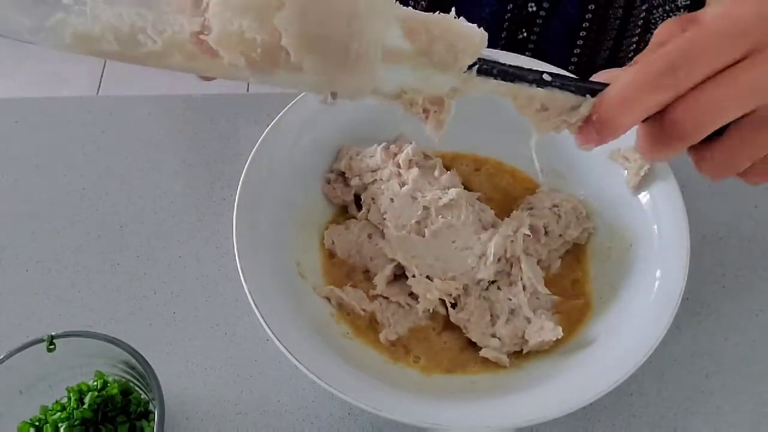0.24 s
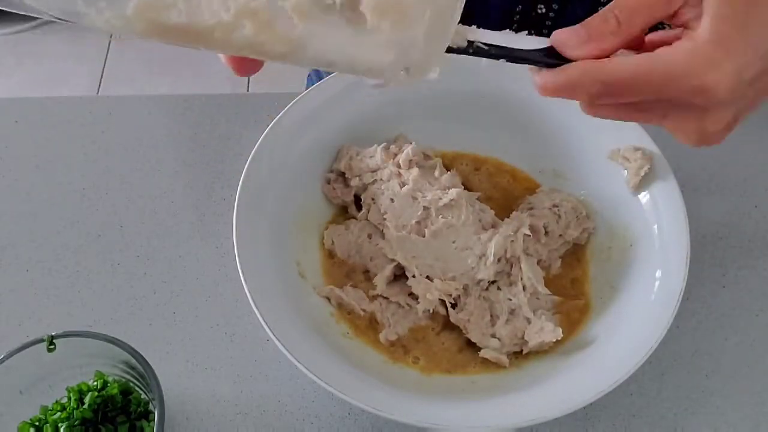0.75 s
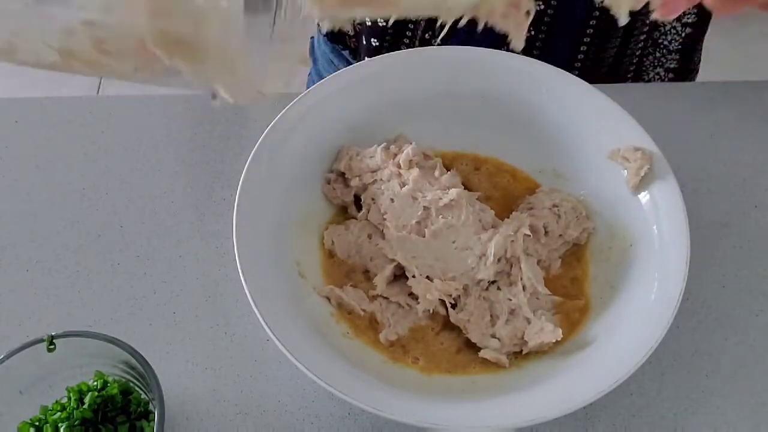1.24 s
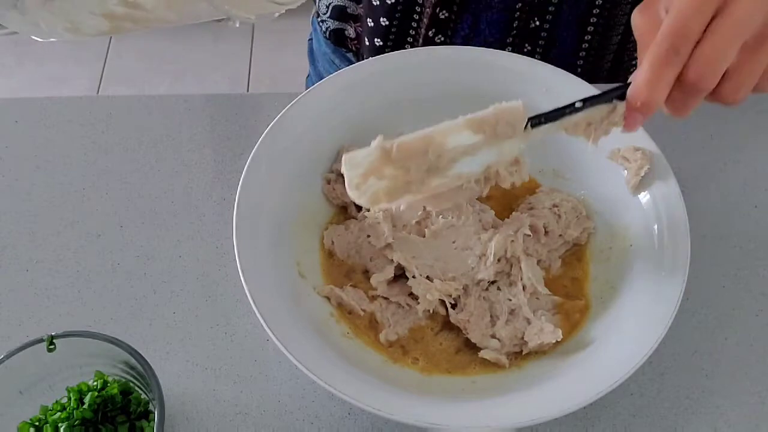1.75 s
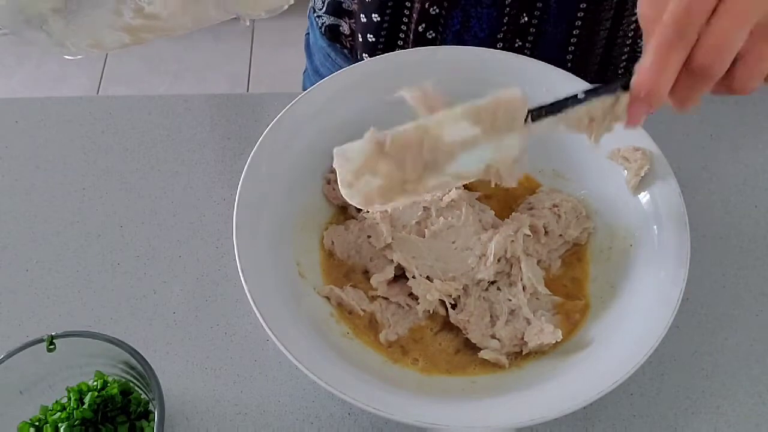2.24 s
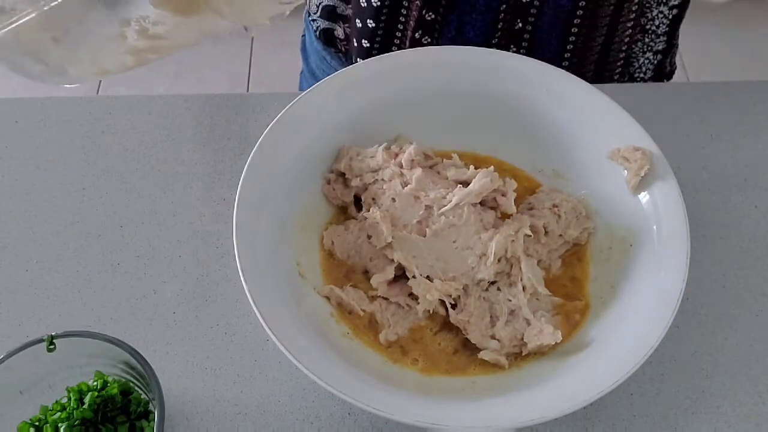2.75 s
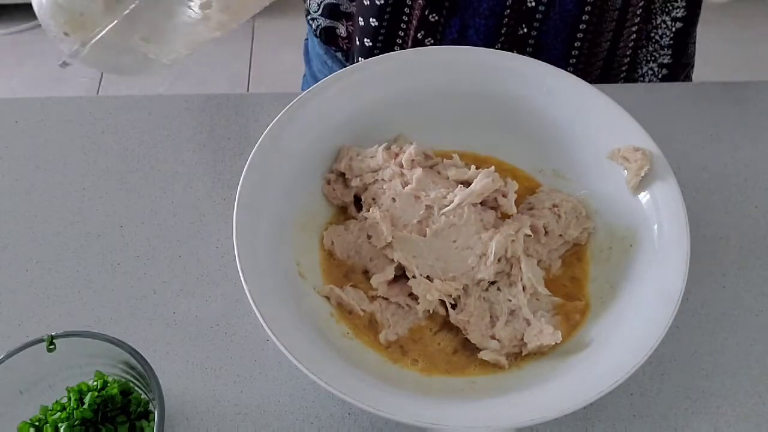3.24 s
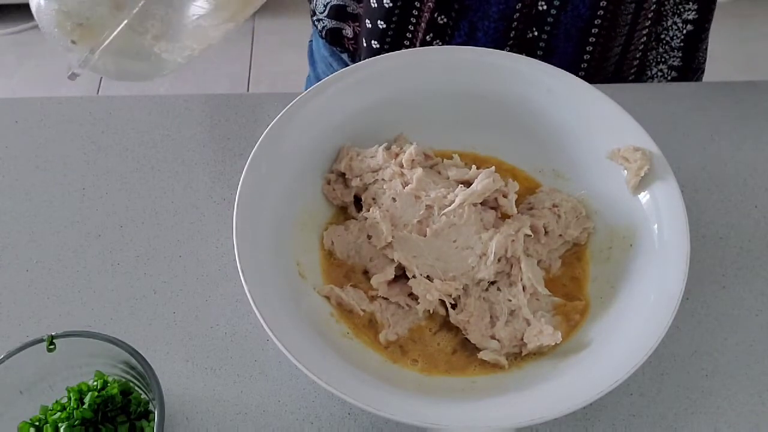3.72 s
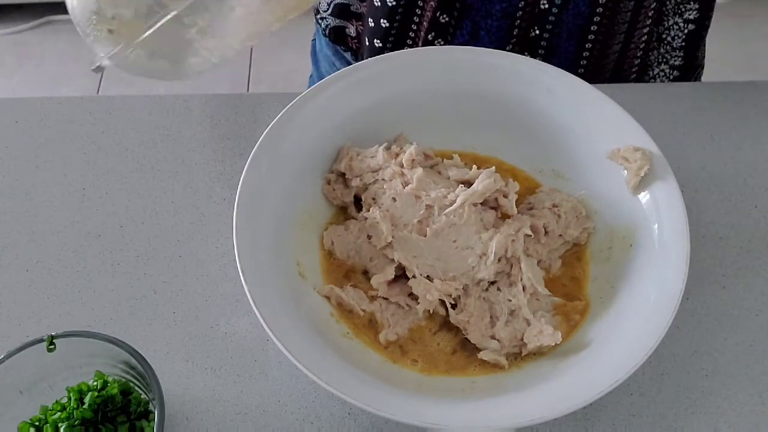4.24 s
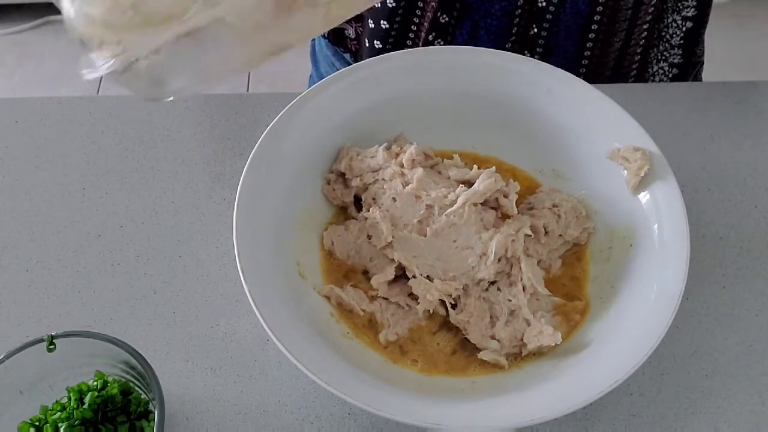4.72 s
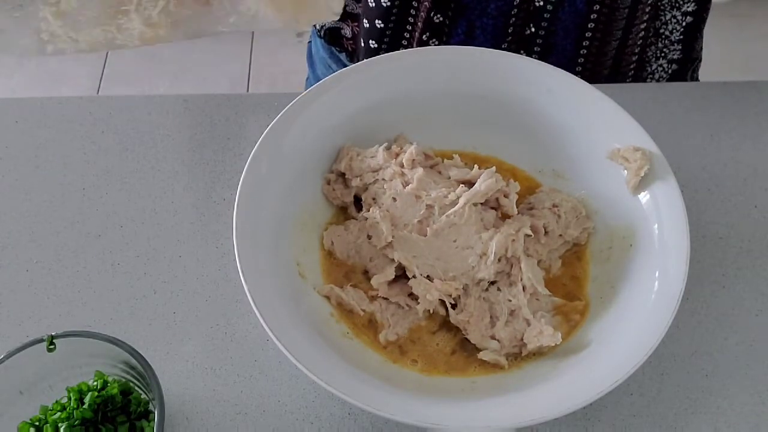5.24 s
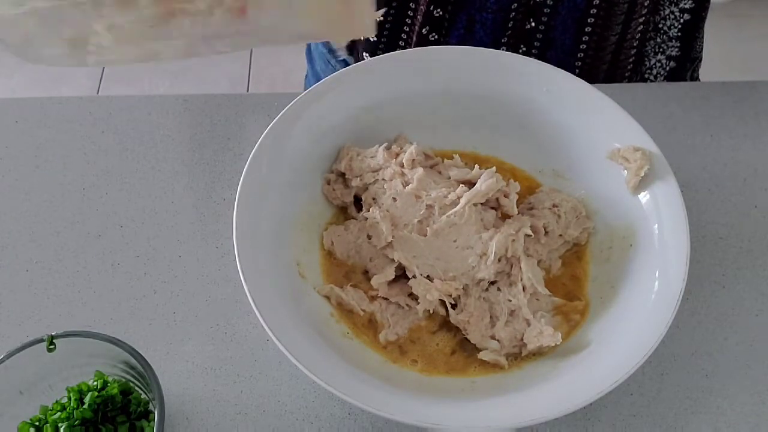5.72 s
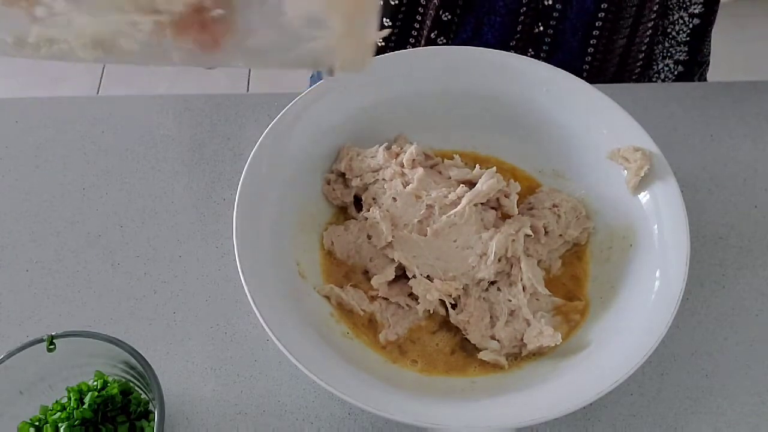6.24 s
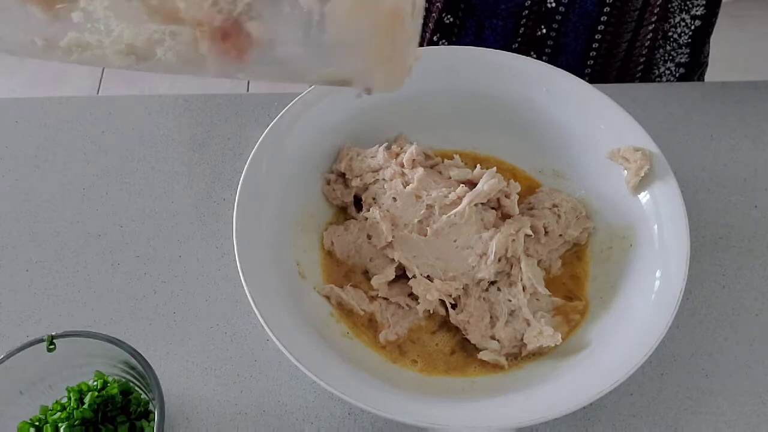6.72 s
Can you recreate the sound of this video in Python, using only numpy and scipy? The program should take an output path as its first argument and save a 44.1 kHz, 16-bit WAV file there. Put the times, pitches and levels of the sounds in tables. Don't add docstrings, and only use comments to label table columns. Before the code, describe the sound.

A steady, low refrigerator drone with soft airy hiss fills a small hard kitchen. In front of it, recorded close in stereo, a spatula blade hits glass sharply, then drags through sticky paste with fine crackle and little smacks. After a quiet gap with a few soft peels, knocking and scraping return in a busy cluster, with short damped glass rings and low jug thuds, easing into light wet dabs at the end.

```python
import sys
import numpy as np
from scipy import signal
from scipy.fft import rfft, irfft, next_fast_len
from scipy.io import wavfile

SR = 44100
rng = np.random.default_rng(int(sys.argv[2]) if len(sys.argv) > 2 else 0)


def file_out(sig):
    cols = np.atleast_2d(sig).T
    lim = np.clip(cols, -1, 1)
    pcm = np.round(lim * 32767).astype(np.int16)
    wavfile.write(sys.argv[1], SR, pcm)


def convert_level_to_amplitude(level_db):
    exponent = np.asarray(level_db, float) / 20
    return 10 ** exponent


N = 307377

COMPRESSOR_HZ, FAN_HZ = 59.185, 44.896
LEFT_LAG_SAMPLES = 10

# multiple, left_db, right_db, left_lead_rad
COMPRESSOR_HARMONICS = [(1, -48, -47.5, -0.0), (3, -75.5, -77.5, 2.5), (4, -61.5, -64.5, -0.36),
                        (5, -71, -66.5, 0.9), (7, -65.5, -64.5, -0.1), (8, -66.5, -68, 7.5),
                        (11, -68.5, -64.5, -0.66), (13, -68, -70, 0.47), (14, -67, -67.5, -2),
                        (16, -78, -78.5, -0.5), (17, -112, -83.5, -5.5), (19, -70, -72, -3.5),
                        (20, -99, -78.5, -11), (22, -75.5, -80, -3.5), (24, -74.5, -74, 2.5),
                        (33, -82.5, -79, -1.5), (34, -105, -83, 3), (45, -83, -95, 1.4),
                        (47, -87, -89.5, 2.5), (77.5, -91.5, -81.5, 2.5)]
# multiple, left_db, right_db, left_lead_rad
FAN_HARMONICS = [(1, -52, -51, 0.24), (2, -60.5, -62.5, 0), (3, -66, -64.5, -0.5), (4, -48.5, -46.5, -0.54),
                 (5, -67, -70, 1), (6, -67.5, -72, -0.5), (7, -67, -82, 0.7), (8, -81.5, -78.5, 4),
                 (9, -83, -75, -3), (11, -66.5, -66, 0), (12, -66, -65.5, 1), (13, -96, -85.5, -5),
                 (14, -72, -82.5, -1), (18, -95, -80, -4)]
# time_s, level_db
MAINS_BUZZ = [
    (0, -59),
    (5.9, -67),
    (6.2, -50),
    (6.65, -50),
    (6.97, -54),
]
# time_s, level_db
VALVE_WHINE = [(0.0, -71.5), (0.13, -71), (0.33, -80), (0.45, -82), (0.5, -76), (0.68, -75), (0.89, -71),
               (1.08, -71.5), (1.76, -66.5), (2.66, -65.5), (3.3, -69), (3.49, -66), (3.82, -68.5),
               (4.46, -65.5), (5.09, -72.5), (6.46, -69.5), (6.97, -76)]
# freq_hz, density_db_per_hz
AIR_SPECTRUM = [(20, -11.5), (45, 7), (110, -2.5), (180, 2.5), (215, -3.5), (480, -2.5), (850, -8),
                (1050, -18), (1400, -15.5), (1750, -20.5), (2000, -24.5), (2400, -26.5), (3800, -28.5),
                (5000, -30.5), (6600, -32), (7700, -30.5), (9500, -33.5), (16000, -32.5)]
# freq_hz, correlation
AIR_LIKENESS = [(60, 1), (180, 1), (550, 0.81), (1650, -0.12), (4970, 0.0057), (15000, -0.11)]
# pitch_hz, t60_s, level_db
COOLANT_HISSES = [
    (1930, 0.029, -79.5),
    (4680, .04, -89),
    (5000, .035, -91),
]
# start_s, length_s, crackle_start_db, swell_db
BLADE_STROKES = [(0, 0.36, -73.5, 6.5), (0.343, 0.37, -63.5, -9.5), (0.722, 0.17, -61, -2.5),
                 (.89, 0.22, -60.5, -22), (2.02, 0.16, -72.5, 2.5), (2.239, .14, -68, 10.5),
                 (3.3, 0.18, -63.5, -5), (4.135, 0.11, -62, 5.5), (4.4, 0.2, -61.5, 1),
                 (4.559, 0.19, -60.5, -18), (4.833, 0.17, -63.5, -8), (5.083, 0.19, -64.5, -9),
                 (5.338, 0.15, -71, -6), (5.602, 0.19, -77, 13), (5.793, 0.22, -62.5, -7.5),
                 (6.121, 0.076, -57.5, -8.5), (6.29, .13, -80, 13), (3.398, 0.042, -52, 2),
                 (.74, .07, -61, -5.5), (.9, 0.043, -58.5, -4), (6.367, .05, -71, -2),
                 (.44, 0.095, -72, -3), (4.653, 0.33, -66, -6), (5.53, 0.07, -57, -12),
                 (5.882, 0.12, -70.5, -4), (6.452, 0.33, -63.5, -10)]
# start_s, peak_db, fizz_re_peak_db
PASTE_SMACKS = [(0.057, -51.5, -9), (.0804, -45.5, -12), (0.181, -41, -13), (.6294, -54, -8),
                (.6624, -53.5, -6), (.914, -36, -10), (0.999, -43.5, -11), (1.0214, -51.5, -2),
                (1.058, -50, -11), (1.5763, -59, -3.5), (1.7585, -51.5, -8), (2.0386, -50.5, -5),
                (2.0512, -49.5, -2), (2.146, -50.5, -4.5), (3.214, -50.5, -7.5), (3.3414, -48, -9),
                (3.506, -48, -9), (3.829, -58, -6), (4.309, -48, -6.5), (5.665, -34, -9.5),
                (5.9594, -49.5, -8), (6.0317, -51.5, -10), (6.303, -44, -6.5), (6.3733, -46, -12),
                (6.5155, -42.5, -9), (6.732, -54, -5)]
# start_s, gap_s, peak_db, fizz_re_peak_db
PASTE_PEELS = [
    (.4034, .0325, -48.5, -7.5),
    (0.7183, 0.019, -40, -10),
    (2.2752, 0.023, -41, -9.5),
    (3.3818, .0167, -29, -7),
    (6.5387, 0.049, -40, -10),
]
# start_s, peak_db, fizz_re_peak_db, body_re_peak_db, t60_s
BLADE_KNOCKS = [(0.3364, -13.5, -19.5, -37, 0.014), (0.3372, -19.5, -17, -18, 0.043),
                (.883, -30, -17, -2.5, 0.017), (0.8874, -28.5, -26.5, -5, 0.051),
                (3.3497, -39, -19, -24, 0.096), (4.129, -36.5, -13.5, -32, 0.052),
                (4.1473, -39.5, -15, -24, 0.066), (4.4393, -42.5, -15.5, -2, 0.04),
                (4.4944, -46.5, -19, -8, .027), (4.5476, -18, -20, -12, 0.049),
                (4.833, -26.5, -20.5, -25, 0.039), (5.0962, -48, -16, -22, .035),
                (5.2962, -33, -15, -7.5, 0.042), (5.434, -41.5, -14, -25, 0.071),
                (5.5586, -26.5, -23, -14, 0.038), (5.657, -41.5, -15, -20, 0.048),
                (5.8425, -36.5, -21.5, -15, 0.031), (6.9252, -53, -20, -13, .035)]
# start_s, peak_db, body_re_peak_db, body_hz
PASTE_DABS = [(0.308, -52.5, -1, 2860), (0.523, -58, 9, 1700), (.7803, -50, 3, 2440),
              (.852, -58.5, 8, 2390), (.9632, -50, -1.5, 2380), (1.113, -56, 3, 1840),
              (1.127, -54, -2, 1530), (4.1905, -47, -7.5, 2450), (4.2021, -52.5, 7, 2500),
              (4.2285, -58, -4, 1950), (4.457, -45.5, -5, 2540), (4.4715, -47.5, 5.5, 2060),
              (4.6108, -55, 13, 2360), (5.184, -55, 4.5, 1940), (5.2591, -60, -2, 1480),
              (5.354, -43.5, -1, 2780), (5.53, -50.5, 1.5, 2450), (5.7189, -55.5, 2, 2420),
              (5.808, -53.5, 2, 2590), (5.886, -48, 4, 2820), (5.909, -54, 3, 5300), (6.1556, -49, 3, 1720),
              (6.2572, -39, 3, 2900), (6.2799, -46, 1, 2050), (6.462, -47, 1.5, 1950),
              (6.851, -40.5, -5, 3180), (6.8562, -41, -2, 1930)]
# pitch_hz, level_db, t60_s
JUG_MODES = [(2894, -1, 0.012), (3230, -8, 0.023), (3970, -21.5, 0.0081), (4960, -10, 0.013),
             (5400, -5.5, 0.0092), (5846, -1.5, 0.013), (6400, 5, 0.00602)]
# start_s, peak_db, pitch_hz, t60_s
GLASS_CHINKS = [(0.3343, -24, 7350, 0.014), (0.3367, -20, 5400, 0.0083), (0.3364, -31, 3260, 0.03),
                (0.719, -38.5, 7300, 0.0065), (0.741, -36.5, 7200, 0.0099), (0.8859, -28, 7000, 0.011),
                (0.887, -29, 5830, 0.011), (0.9164, -42, 7700, 0.015), (4.129, -41, 7135, 0.0093),
                (4.547, -23.5, 4750, 0.009), (4.55, -39.5, 2070, 0.06), (4.549, -38, 2360, 0.014),
                (4.5483, -27.5, 3600, 0.012), (4.8322, -40.5, 6000, 0.0091), (4.834, -40.5, 4050, 0.011),
                (5.293, -39.5, 5700, .01), (5.355, -43.5, 3900, 0.011), (5.5588, -42, 4250, .012),
                (5.559, -28, 5850, 0.019), (5.666, -44.5, 8000, 0.011), (5.8418, -41.5, 5740, 0.0095),
                (6.2577, -41, 3310, 0.01), (6.5899, -52, 7600, 0.0072), (6.2815, -45, 1970, 0.035),
                (6.857, -40, 1864, 0.047)]
# start_s, peak_db, slap_re_peak_db
HOLLOW_TOCKS = [(0.3351, -44, 43.5), (0.338, -36, 22), (0.886, -39.5, 21), (4.17, -42.5, 23),
                (4.205, -47, 27), (4.45, -42.5, 22), (4.477, -43.5, 25), (4.548, -56, 33),
                (5.557, -41.5, 18), (6.155, -47, 23), (6.257, -42, 35.5)]
# start_s, peak_db, pitch_hz, t60_s
CLEAR_PINGS = [(0.336, -35, 1700, 0.022), (0.337, -13.5, 5350, 0.0094), (.340, -36, 4980, .04),
               (.3565, -36, 5000, .03), (0.337, -38, 4170, .025), (.7405, -43, 1980, .03),
               (0.74, -34, 8270, 0.017), (.7655, -41, 5540, .02), (.7805, -48, 5400, .02),
               (0.8828, -39, 1220, 0.045), (0.882, -35, 1550, 0.049), (.8825, -47, 2090, .03),
               (.886, -41, 6850, .03), (.887, -39, 5040, 0.038), (1.562, -50, 1400, .02),
               (3.399, -29, 6500, .008), (4.1485, -46, 3400, 0.031), (4.168, -57, 5630, 0.065),
               (4.195, -49, 1240, 0.077), (4.4395, -49, 5650, .03), (4.442, -45, 2440, .025),
               (4.47, -42, 1250, 0.047), (4.4725, -54, 5540, .03), (4.485, -52, 2070, .04),
               (4.548, -42, 2800, .03), (4.548, -37, 6240, .03), (4.549, -36, 4740, 0.044),
               (4.549, -65, 1510, .03), (4.835, -38, 2460, .025), (4.8335, -42, 3420, 0.046),
               (4.833, -35, 6190, .025), (4.833, -50, 5000, .03), (4.833, -52, 1240, 0.028),
               (4.977, -54, 6240, .015), (5.0955, -52, 5740, 0.03), (5.26, -52, 1300, .02),
               (5.2955, -52, 2340, .03), (5.296, -39, 2820, 0.042), (5.353, -38, 5850, .02),
               (5.558, -36, 2400, .03), (5.558, -48, 3230, .03), (5.5585, -43, 4290, 0.042),
               (5.559, -44, 6170, .03), (5.717, -51, 2400, 0.022), (5.842, -55, 4100, .02),
               (6.155, -45, 1750, .025), (6.258, -52, 1400, .03), (6.856, -41, 1390, 0.033),
               (.3356, -28.5, 790, 0.03), (6.854, -41, 3160, 0.022)]
# start_s, peak_db, low_hz, high_hz, t60_s
EDGE_CRACKS = [(0.3375, -17, 4400, 6400, .01), (.3360, -30, 220, 800, .03), (.340, -35, 2500, 6500, 0.13),
               (.345, -42, 6500, 12000, .09), (0.718, -39, 3000, 15000, .02),
               (.7397, -40, 2500, 15000, .025), (.757, -45, 5000, 7500, .02), (.767, -50, 2000, 6500, .03),
               (.781, -56, 2100, 2800, .1), (.884, -40, 300, 2500, 0.028), (.890, -43, 2000, 8000, .13),
               (.944, -52, 1500, 8000, .015), (1.5604, -53, 900, 2000, .02), (3.3567, -46, 2500, 6500, .03),
               (3.4108, -35, 4500, 8300, 0.055), (3.435, -37, 2000, 7500, 0.024),
               (4.4397, -50, 5200, 7500, .06), (4.4707, -48, 1000, 7000, .02),
               (4.550, -39, 3000, 8180, .17), (4.8337, -38, 2100, 3000, .05),
               (5.2594, -54, 900, 2500, .015), (5.295, -42, 1800, 3500, 0.045),
               (5.7169, -52, 900, 3000, .015), (5.887, -43.5, 900, 6000, 0.044),
               (5.909, -54, 4500, 9000, .02), (6.154, -47, 700, 4000, .03),
               (6.4625, -45.5, 1200, 5500, .04), (6.5896, -42.5, 3500, 9000, .02),
               (6.68, -49, 5000, 9500, .02), (6.71, -50, 2500, 7000, .02), (6.856, -41, 1200, 8500, 0.022)]
# start_s, peak_db, low_hz, high_hz, t60_s
LINGERING_WASHES = [(.37, -52, 4400, 6300, 0.53), (.37, -54, 2600, 3900, .6), (.785, -55, 2150, 2700, .5),
                    (.79, -58, 4000, 8200, .4), (.92, -53, 2000, 6000, .4), (4.585, -48, 3200, 6370, 0.65),
                    (4.845, -51, 2210, 8000, 0.27), (5.31, -56, 1900, 6200, .4),
                    (5.44, -60, 4200, 6200, .5), (5.58, -57, 2000, 5800, .4), (5.69, -60, 2000, 8000, .5),
                    (5.92, -59, 2500, 3100, .5), (5.92, -61, 4600, 8200, .5), (4.15, -48, 3100, 3700, 0.23)]
# start_s, peak_db, pitch_hz, t60_s
DULL_THUDS = [(0.918, -31.5, 112, 0.015), (0.9073, -32, 109, 0.045), (4.1956, -43, 125, 0.025),
              (4.614, -39, 110, 0.026), (5.35, -41, 84, 0.04), (5.5614, -34, 116, 0.044),
              (5.848, -31.5, 89, 0.035), (5.838, -38, 100, 0.041), (6.154, -22, 105, 0.08),
              (6.274, -36, 95, 0.05), (6.4856, -34, 123, 0.063)]
# freq_hz, gain_db
MICROPHONE_RESPONSE = [(3000, 1), (6000, 0.6), (6700, 2.5), (7800, 7), (8400, -2.5), (9000, -8),
                       (10500, -3.5), (12500, 0), (15000, -6), (15800, -1), (16300, -6), (16900, -45)]


def rms_one(x):
    return x / np.sqrt(np.mean(x ** 2) + 1e-20)


def at_hz(points, freq_hz):
    table_hz, value = np.transpose(points)
    return np.interp(np.log(freq_hz + 1), np.log(table_hz), value)


def band(x, low_hz, high_hz):
    return signal.sosfilt(signal.butter(2, [low_hz, high_hz], "band", fs=SR, output="sos"), x)


def drift(rate_hz):
    pole = np.exp(-80 * np.pi * rate_hz / SR)
    noise = rng.standard_normal(N // 40 + 2002)
    slow = signal.lfilter([1], [1, -2 * pole, pole * pole], noise)[2000:]
    return np.interp(np.arange(N) / 40, np.arange(len(slow)), rms_one(slow))


def ring(x, pitch_hz, t60_s):
    pole, w = convert_level_to_amplitude(-60 / (t60_s * SR)), 2 * np.pi * pitch_hz / SR
    return signal.lfilter([0, np.sin(w)], [1, -2 * pole * np.cos(w), pole * pole], x + 1e-18)


def add(out, sound, start_s):
    at = round(start_s * SR)
    out[:, at:at + sound.shape[-1]] += sound[..., :N - at]


def snaps(shape, spread_db, shared):
    once = shape[:-2] + (1, shape[-1])
    size = convert_level_to_amplitude(spread_db * np.minimum(rng.exponential(1, once), 5))
    common = shared * rng.standard_normal(once)
    return rms_one(size * (common + rng.standard_normal(shape)))


def motor(harmonics, turn_hz, wobble_db):
    angle, wave = np.linspace(0, 2 * np.pi, 8193), 0
    for multiple, left_db, right_db, left_lead_rad in harmonics:
        phase = rng.uniform(0, 2 * np.pi) + np.array([[left_lead_rad], [0]])
        wave = wave + convert_level_to_amplitude([[left_db], [right_db]]) * np.sin(round(multiple) * angle + phase)
    turn = 2 * np.pi * (turn_hz * np.arange(N) / SR % 1)
    stereo = np.array([np.interp(turn, angle, side) for side in wave])
    return np.sqrt(2) * stereo * convert_level_to_amplitude(wobble_db * drift(1.4))


def stray_tones():
    t = np.arange(N) / SR
    buzz = convert_level_to_amplitude(np.interp(t, *np.transpose(MAINS_BUZZ))) * np.sin(2 * np.pi * 119.93 * t)
    slip = -convert_level_to_amplitude(-63) * np.sin(2 * np.pi * 118.47 * t)
    panel = convert_level_to_amplitude(-68) * np.sin(2 * np.pi * 95.6 * t)
    whine_phase = 2 * np.pi * 21 * COMPRESSOR_HZ * t + [[-1.4], [0]]
    whine = convert_level_to_amplitude(np.interp(t, *np.transpose(VALVE_WHINE))) * np.sin(whine_phase)
    return np.sqrt(2) * (buzz + slip + whine + panel)


def room_air():
    freq_hz = np.arange(N // 2 + 1) * SR / N
    mid, side = rfft(rng.standard_normal((2, N)))
    alike = np.clip(at_hz(AIR_LIKENESS, freq_hz), -1, 1)
    pair = np.sqrt(1 + alike) * mid + np.sqrt(1 - alike) * side * [[1], [-1]]
    air = rms_one(irfft(pair * convert_level_to_amplitude(at_hz(AIR_SPECTRUM, freq_hz)), N))
    return convert_level_to_amplitude(-52.5) * air * convert_level_to_amplitude([[-.5], [.5]])


def coolant():
    out = np.zeros((2, N))
    for pitch_hz, t60_s, level_db in COOLANT_HISSES:
        hiss = rms_one(ring(rng.standard_normal((2, N)), pitch_hz, t60_s))
        out += convert_level_to_amplitude(level_db + 2.5 * drift(1.2)) * hiss
    return out


def tearing():
    edge_s, fizz_db = 0.035, -3.5
    t, moving = np.arange(N) / SR, np.zeros(N)
    grains = snaps((2, N), spread_db=5.0, shared=.3) * convert_level_to_amplitude(3.2 * drift(110))
    wall = np.zeros((2, N))
    for pitch_hz, level_db in [(2400, -22.5), (3400, -24.5), (4900, -28), (5800, -23.0)]:
        wall += convert_level_to_amplitude(level_db) * ring(grains, pitch_hz, 0.014)
    crackle = rms_one(band(grains, 2300, 8800) + wall)
    fizz = rms_one(band(grains, 10900, 15350))
    for start_s, length_s, crackle_db, swell_db in BLADE_STROKES:
        edge = np.clip(np.minimum(t - start_s, start_s + length_s - t) / edge_s, 0, 1)
        moving += edge * convert_level_to_amplitude(crackle_db + swell_db * np.clip((t - start_s) / length_s, 0, 1))
    return moving * (crackle + convert_level_to_amplitude(fizz_db) * fizz)


def kitchen(x):
    t60_s, wall_cut_hz = .28, 1700
    size = next_fast_len(N + SR)
    w = 2 * np.pi * np.arange(size // 2 + 1) / size
    dull = 1 / (1 + 1j * w * SR / (2 * np.pi * wall_cut_hz))
    echo = np.zeros((2, len(w)), complex)
    for k, lag_s in enumerate(rng.uniform(0.0048, .03, 16)):
        loop = convert_level_to_amplitude(-60 * lag_s / t60_s) * dull ** 0.47 * np.exp(-1j * w * round(lag_s * SR))
        echo[k % 2] += loop / (1 - loop) * (-1) ** (k // 2)
    for lag_samples in (53, 131, 223, 347):
        step = np.exp(-1j * w * lag_samples)
        echo *= (step - .6) / (1 - .6 * step)
    return irfft(rfft(x, size) * echo, size)[:, :N]


def touches():
    knock_body_hz = 2300
    rows = [(start_s, peak_db, fizz_db, -19.5, 1700, 0.048) for start_s, peak_db, fizz_db in PASTE_SMACKS]
    for start_s, gap_s, peak_db, fizz_db in PASTE_PEELS:
        for k, slip_db in enumerate((-7, 0, -4, -8)):
            rows.append((start_s + k * gap_s, peak_db + slip_db, fizz_db, -35, knock_body_hz, 0.056))
    for start_s, peak_db, fizz_db, body_db, t60_s in BLADE_KNOCKS:
        rows.append((start_s, peak_db, fizz_db, body_db, knock_body_hz, t60_s))
    for start_s, peak_db, body_db, body_hz in PASTE_DABS:
        rows.append((start_s, peak_db, -17, body_db, body_hz, 0.058))
    return rows


def contacts():
    lead_in_s = .012
    out, t = np.zeros((2, N)), np.arange(SR // 10) / SR
    start_s, peak_db, fizz_db, body_db, body_hz, t60_s = np.array(touches()).T[:, :, None, None]
    count = len(start_s)
    since_s = np.maximum(t - lead_in_s, 0)
    lead_in = convert_level_to_amplitude(-23) * np.minimum(t / lead_in_s, 1) ** 2
    attack = np.minimum(since_s / (0.078 * t60_s), 1) ** 2
    bite = (lead_in + attack) * convert_level_to_amplitude(-60 * since_s / t60_s)
    shower = snaps((count, 2, len(t)), spread_db=2.0, shared=0.28) * bite
    hard_db = -.5 * (fizz_db + 17.0)
    sound = convert_level_to_amplitude(-1.0) * band(shower, 3940, 9340)
    sound += convert_level_to_amplitude(hard_db * 0.27 - 1.5) * band(shower, 2790, 4480)
    sound += convert_level_to_amplitude(fizz_db + 11.5) * band(band(shower, 8800, 19000), 8800, 19000)
    sound += convert_level_to_amplitude(body_db + 6) * band(shower, 1410, 4100)
    spot_db = rng.normal(0, 3, (count, len(JUG_MODES), 2, 1))
    for k, (mode_hz, mode_db, mode_t60_s) in enumerate(JUG_MODES):
        sound += convert_level_to_amplitude(mode_db + spot_db[:, k] + hard_db - 27.5) * ring(shower, mode_hz, mode_t60_s)
    for k in range(count):
        patch = convert_level_to_amplitude(body_db[k] - 18) * ring(shower[k], body_hz[k, 0, 0], .013)
        add(out, (sound[k] + patch) * convert_level_to_amplitude(peak_db[k]), start_s[k, 0, 0] - lead_in_s - .002)
    return out


def chinks():
    out, t = np.zeros((2, N)), np.arange(SR // 16) / SR
    rattles = snaps((len(GLASS_CHINKS), 2, len(t)), spread_db=7.5, shared=0.17) * convert_level_to_amplitude(-60 * t / 0.019)
    for (start_s, peak_db, pitch_hz, t60_s), rattle in zip(GLASS_CHINKS, rattles):
        add(out, convert_level_to_amplitude(peak_db - 12.5) * ring(rattle, pitch_hz, t60_s), start_s)
    return out


def tocks():
    start_s, peak_db, slap_db = np.transpose(HOLLOW_TOCKS)
    at = np.round(start_s * SR).astype(int)
    clicks, slaps = np.zeros((2, N))
    clicks[at] = convert_level_to_amplitude(peak_db - 6.0)
    slaps[at] = convert_level_to_amplitude(peak_db + slap_db)
    hollow = ring(band(clicks, 280, 810) * convert_level_to_amplitude(7.0), 524, 0.098)
    return hollow + band(band(slaps, 200, 1280), 110, 2150)


def pings():
    rise_s = .0012
    out, t = np.zeros((2, N)), np.arange(SR // 12) / SR
    for start_s, peak_db, pitch_hz, t60_s in CLEAR_PINGS:
        swell = np.minimum(t / rise_s, 1) * convert_level_to_amplitude(peak_db - 60 * t / t60_s)
        add(out, swell * np.sin(2 * np.pi * pitch_hz * t), start_s)
    return out


def cracks():
    out, t = np.zeros((2, N)), np.arange(SR // 8) / SR
    bursts = snaps((len(EDGE_CRACKS), 2, len(t)), spread_db=3.0, shared=1.5)
    for (start_s, peak_db, low_hz, high_hz, t60_s), burst in zip(EDGE_CRACKS, bursts):
        decay = convert_level_to_amplitude(peak_db - 5.0 - 60 * t / t60_s)
        add(out, decay * rms_one(band(burst, low_hz, high_hz)), start_s)
    out[0] = np.roll(out[0], LEFT_LAG_SAMPLES)
    return out


def washes():
    out, t = np.zeros((2, N)), np.arange(SR // 4) / SR
    fade = np.minimum(t / .015, 1) * np.minimum((t[-1] - t) / .05, 1)
    grains = snaps((len(LINGERING_WASHES), 2, len(t)), spread_db=6.0, shared=.8)
    for (start_s, peak_db, low_hz, high_hz, t60_s), grain in zip(LINGERING_WASHES, grains):
        decay = convert_level_to_amplitude(peak_db - 9.5 - 60 * t / t60_s)
        add(out, decay * fade * rms_one(band(grain, low_hz, high_hz)), start_s)
    return out


def thuds():
    out, t = np.zeros((2, N)), np.arange(SR // 6) / SR
    for start_s, peak_db, pitch_hz, t60_s in DULL_THUDS:
        push = np.minimum(t * pitch_hz * 1.5, 1)
        swing = push * convert_level_to_amplitude(-60 * t / max(t60_s, .02)) * np.sin(2 * np.pi * pitch_hz * t)
        add(out, -convert_level_to_amplitude(peak_db) * swing / np.abs(swing).max(), start_s)
    return out


def scene():
    hum = motor(COMPRESSOR_HARMONICS, COMPRESSOR_HZ, wobble_db=1.0)
    hum += motor(FAN_HARMONICS, FAN_HZ, wobble_db=1.2) + stray_tones()
    pan = convert_level_to_amplitude([[-1.4], [.9]])
    broad = (tearing() + contacts()) * pan + tocks()
    notes = (chinks() + pings()) * pan
    near = broad + notes
    near[0] = np.roll(near[0], LEFT_LAG_SAMPLES)
    echoes = convert_level_to_amplitude(-19.5) * kitchen(broad + convert_level_to_amplitude(-11.5) * notes)
    background = hum + room_air() + coolant()
    return background + near + echoes + (cracks() + washes()) * pan + thuds()


def band_limit(x):
    return signal.sosfilt(signal.butter(12, 15950, fs=SR, output="sos"), x)


def record(dry):
    freq_hz = np.arange(N // 2 + 1) * SR / N
    mix = irfft(rfft(dry) * convert_level_to_amplitude(at_hz(MICROPHONE_RESPONSE, freq_hz)), N)
    return band_limit(mix)


dry = scene()
out = record(dry)
file_out(out)
```